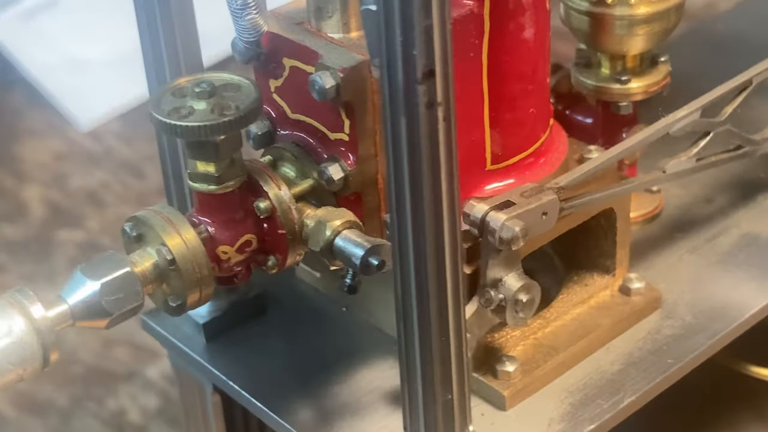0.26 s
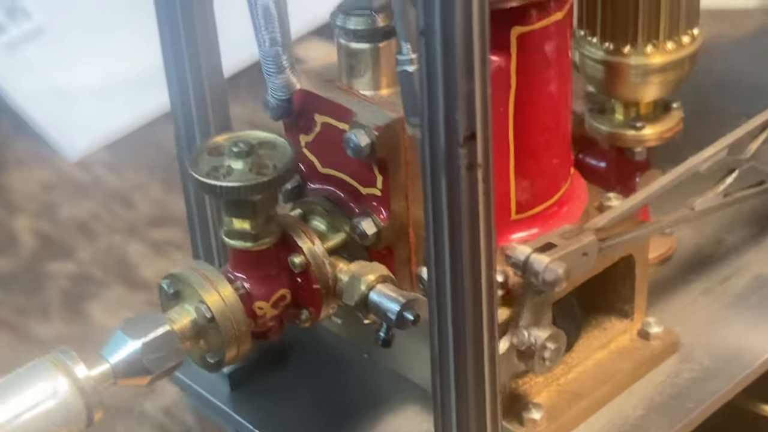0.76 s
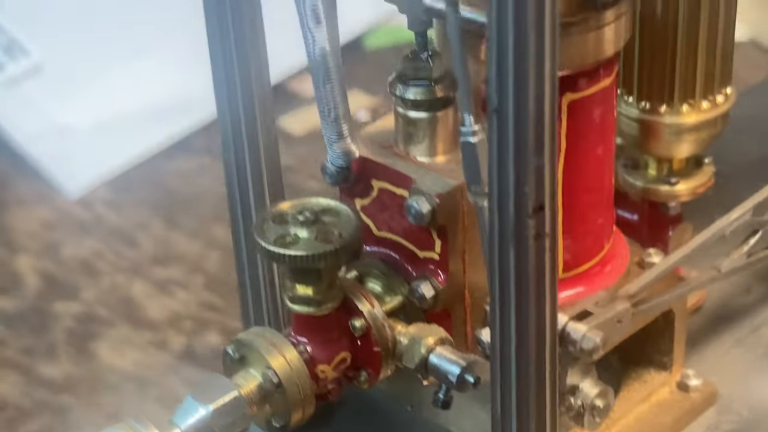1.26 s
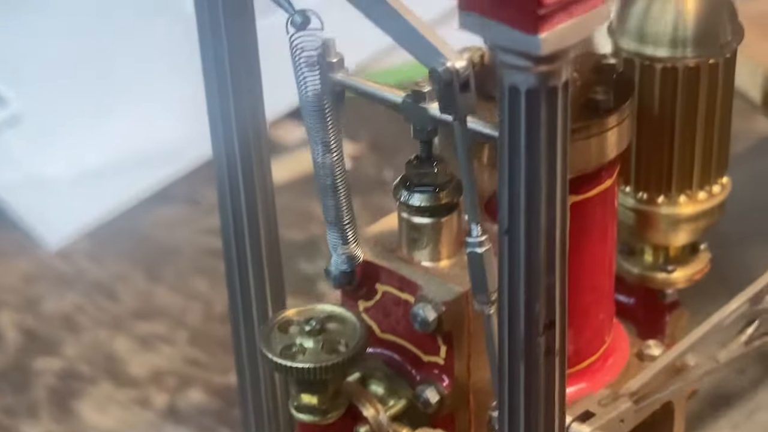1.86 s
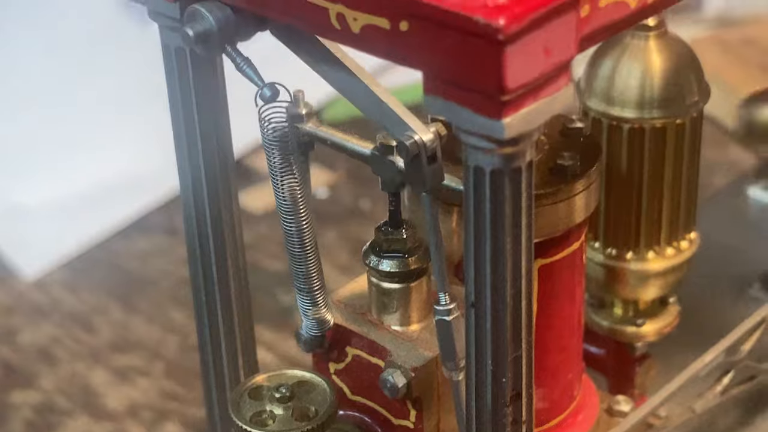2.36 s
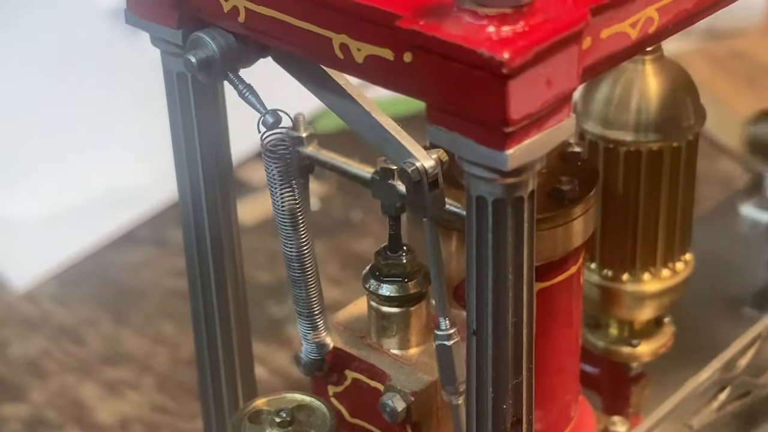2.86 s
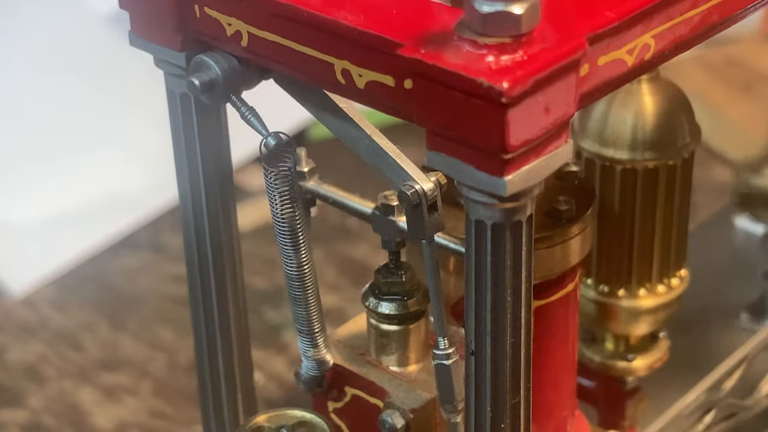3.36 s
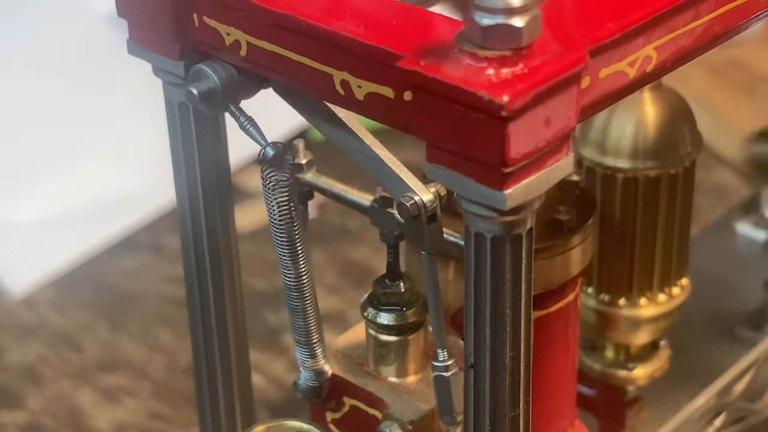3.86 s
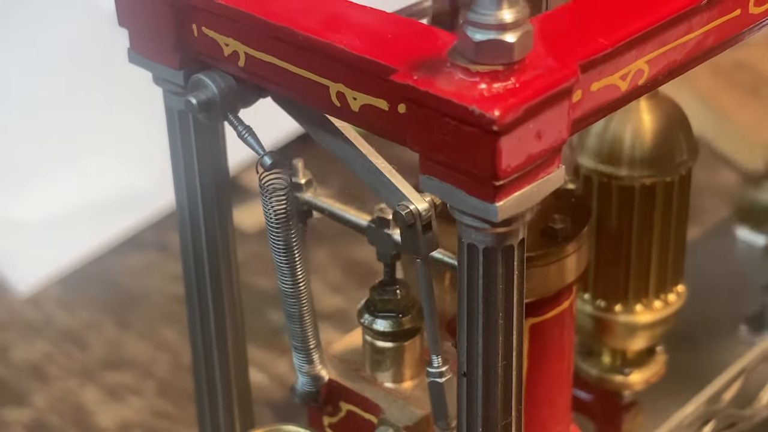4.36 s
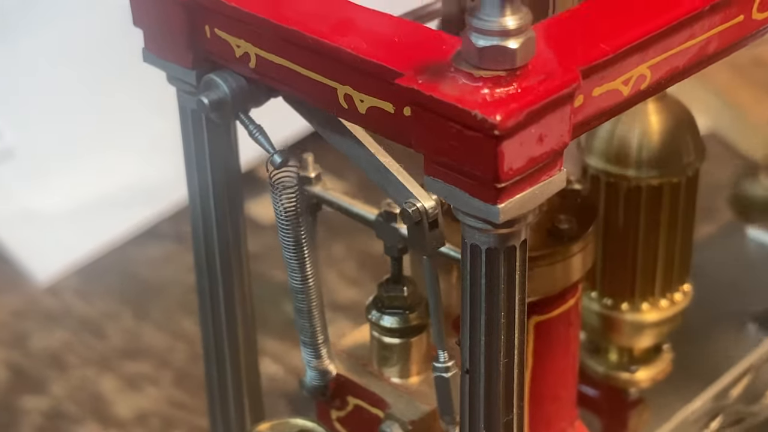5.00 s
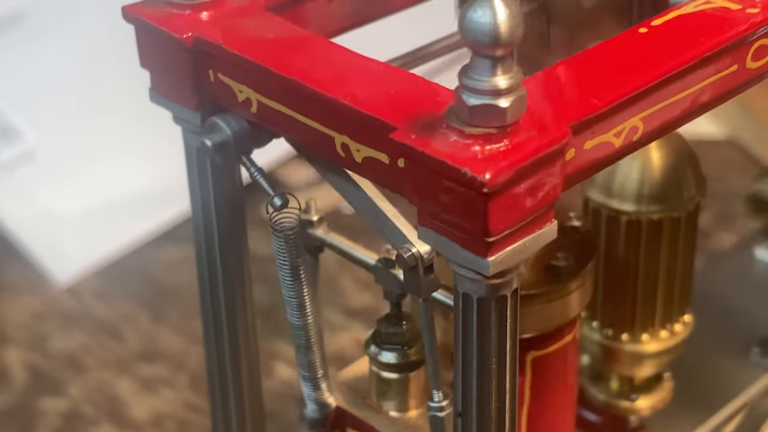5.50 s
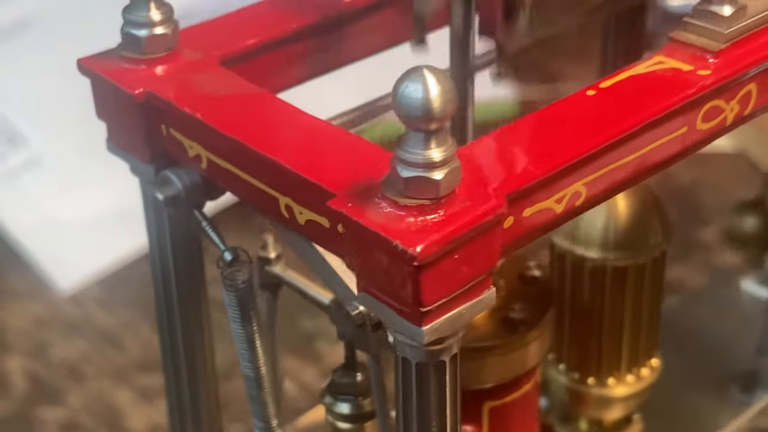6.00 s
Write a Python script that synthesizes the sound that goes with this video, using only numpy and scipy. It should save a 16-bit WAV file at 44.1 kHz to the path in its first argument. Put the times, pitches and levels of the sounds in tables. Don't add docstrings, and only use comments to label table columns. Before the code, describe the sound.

From 0 to about 6.2 seconds a small model beam engine runs on air without pause, a hand's width from a stereo phone microphone in a quiet room. Down strokes come roughly every 0.31 seconds, the first near 0.1, with up strokes midway between, making about 6.5 beats per second. Each beat is a turbulent hiss of some 30 to 40 milliseconds, bright around 10 kHz, and a short knock on the iron frame. Down knocks are heavier, preceded by a tiny flip; up knocks are lighter, higher and clicky, with a slight settling after. Uneven gear ticking and scraping fills the gaps, swelling between four and five times per second and dipping at the strokes. Faint low hum lies underneath. From about 1 to 2.6 seconds the rising phone leaves the jet's line and the hiss softens slightly. Near 6.2 a faint grip rumble ends it.

```python
import sys
import numpy as np
from scipy import signal
from scipy.fft import rfft, irfft
from scipy.io import wavfile
from scipy.ndimage import uniform_filter1d

SR = 44100
rng = np.random.default_rng(int(sys.argv[2]) if len(sys.argv) > 2 else 0)


def attenuation_scalar(level_db):
    decades = np.asarray(level_db, float) / 20
    return 10 ** decades


def log_audio(samples):
    frames = np.atleast_2d(samples).T
    limited = np.clip(frames, -1, 1)
    pcm = np.round(limited * 32767).astype(np.int16)
    wavfile.write(sys.argv[1], SR, pcm)


N = 275184
TIME = np.arange(N) / SR
FREQ = np.arange(N // 2 + 1) * SR / N


def unit(x):
    return x / np.sqrt(np.mean(x ** 2))


def noise():
    return rng.standard_normal((3, N))


def walk(rate_hz):
    hold = int(SR / rate_hz)
    steps = np.repeat(rng.standard_normal(N // hold + 1), hold)
    return unit(uniform_filter1d(steps, hold)[:N])


def band(x, hz, width_hz):
    return signal.lfilter(*signal.iirpeak(hz, hz / width_hz, SR), x)


def steep(x, hz, width_hz):
    section = np.concatenate(signal.iirpeak(hz, hz / width_hz, SR))
    return signal.sosfilt(2 * [section], x)


# t/s, height (0 = level with the valve, 1 = above it)
RISE = [(0, 0.01), (.8, .15), (1.4, .35), (1.8, .65), (2.6, .98), (3.6, 1.02), (4.5, .82), (5.3, .92),
        (6.24, .85)]


def rise():
    return np.interp(TIME, *np.transpose(RISE))


def opening(times, levels_db, valve):
    lead_s, attack_s, shut_s, release_s, full_db, leak_db, leak_s = valve

    def slide(share):
        return np.sin(np.pi / 2 * np.clip(share, 0, 1)) ** 2

    out = np.zeros(N)
    for s, level_db in zip(times, levels_db):
        near = slice(max(int((s - lead_s) * SR), 0), int((s + leak_s) * SR))
        t = TIME[near] - s
        flow = attenuation_scalar(full_db) * slide((shut_s - t) / release_s)
        leak = attenuation_scalar(leak_db) * np.clip(1 - t / leak_s, 0, 1)
        out[near] += attenuation_scalar(level_db) * slide((t + lead_s) / attack_s) * (flow + leak)
    return out


# opens before the knock t/s, attack t/s, shut after the knock t/s, release t/s,
# full level/dB, leak level/dB, leak gone after the knock t/s
DOWN_VALVE = (.0265, .015, .0115, .0215, 1.8, -20, .065)
UP_VALVE = (.029, .0155, .003, .0165, 3.4, -22, .065)


def valve(down_s, down_db, up_s, up_db):
    return opening(down_s, down_db, DOWN_VALVE) + opening(up_s, up_db, UP_VALVE)


# f/Hz, width f/Hz, level/dB, swell per governor turn level/dB
GEARS = [(302, 99, -62.5, 3.5), (554, 86, -52, 4), (735, 48, -48.5, 2.5), (800, 47, -51.5, 5),
         (1141, 59, -53.5, 6), (1364, 46, -49.5, 4), (1537, 183, -51, 2.5), (1713, 224, -46, 1.5),
         (1840, 48, -51, 2), (1965, 151, -51, 2), (2498, 115, -58.5, 4.5), (2710, 670, -51.5, 1),
         (3498, 165, -52.5, 0.5), (4560, 150, -56, 2.5), (4902, 72, -50.5, 7.5), (5294, 93, -60.5, -2),
         (4200, 250, -61, 26), (5490, 124, -55, 6), (6640, 260, -55, 3), (7570, 300, -54, 2),
         (8380, 470, -50, 3), (9080, 930, -47.5, 4), (10430, 520, -55.5, 1.5), (11440, 300, -57.5, 2),
         (12900, 330, -65, -2), (15600, 200, -67, 5)]
# f/Hz, width f/Hz, level/dB
TOOTH_CLICK = [(4976, 870, -50.5), (8000, 3200, -69), (10800, 1200, -62)]
# t/s, level/dB
FACING = [(0, 3.5), (.6, 1.5), (1.3, 1.5), (2, 0.8), (3, 1.3), (4, 1), (5, 0.8), (6.24, 2.2)]


def gears(down, up):
    tooth_hz, rub_s = 143.3, 0.00086
    governor_turns, governor_start = 1.415, .436

    earlier_s = 2 * down[0, 0] - down[0, 1]
    crank = np.interp(TIME, np.r_[earlier_s, down[0]], np.arange(len(down[0]) + 1) - 1.01)
    bite = np.tanh(2.75 * np.cos(2 * np.pi * (governor_turns * crank - governor_start)))
    bite = bite + .12 * np.interp(TIME, *np.transpose(FACING))

    gap, size = rng.standard_normal((int(N / SR * tooth_hz * 2), 2)).T
    at = np.cumsum((1 + .06 * gap) * SR / tooth_hz).astype(int)
    teeth = np.zeros(N)
    teeth[at[at < N]] = attenuation_scalar(1.5 * size[at < N])

    scrape = signal.lfilter([1], [1, -np.exp(-1 / (rub_s * SR))], teeth)
    rub = (unit(scrape) + attenuation_scalar(5.0)) * noise()
    contact = (unit(teeth) * attenuation_scalar(-1) + rub) * attenuation_scalar(0.66 * walk(30))

    clicks = teeth * attenuation_scalar(14.4 * bite)
    out = sum(attenuation_scalar(db) * unit(steep(clicks, hz, 0.93 * width_hz)) for hz, width_hz, db in TOOTH_CLICK)
    for hz, width_hz, db, swell_db in GEARS:
        ring = steep(contact * attenuation_scalar(0.96 * swell_db * bite), hz, 1.32 * width_hz)
        out = out + attenuation_scalar(db) * unit(ring)

    slack = np.clip(valve(down[0], 0 * down[0], up[0], 0 * up[0]), 0, 1)
    return out * attenuation_scalar(-4 * slack)


# f/Hz, width f/Hz, level/dB
HUM = [(64.4, 15, -66.5), (75, 19, -65), (121, 10.3, -58.5), (195, 40, -66), (253, 27, -61),
       (450, 230, -58.5), (956, 76, -58.5)]


def hum():
    return sum(attenuation_scalar(db + 1.1 * walk(3.6)) * unit(band(noise(), hz, width_hz)) for hz, width_hz, db in HUM)


# f/Hz, level/dB
JET = [(2300, -25.5), (3200, -22.5), (3700, -9.5), (4000, -5.5), (4400, -8.5), (5000, -18.5), (6700, -17),
       (7600, -6), (8400, -5.5), (9200, -1.5), (10200, 3), (11200, -5.5), (13200, -16.5), (15300, -18.5)]
JET_EDGES = (5700, 8500, 11800)
# level with the valve level/dB, from above level/dB, extra on the up stroke level/dB, lag t/s
JET_AIM = [
    (-36.2, -37, 1.5, .002),
    (-37.5, -35.8, 1.7, .0017),
    (-22.7, -29.5, 0.1, 0),
    (-35.6, -32.9, -.5, .0004),
]


def exhaust(down, up):
    hz, db = np.transpose(JET)
    jet = rfft(noise()) * attenuation_scalar(np.interp(np.log(FREQ + 1), np.log(hz), db, left=-60))
    zone = np.digitize(FREQ, JET_EDGES)
    flutter = attenuation_scalar(1.5 * walk(400))
    height = rise()

    def strength(strokes):
        _, puff_db, dull_db, thin_db = strokes
        return puff_db + [dull_db, dull_db, 0 * dull_db, thin_db]

    down_db, up_db = strength(down), strength(up)
    out = 0
    for part, (level_db, above_db, extra_db, lag_s) in enumerate(JET_AIM):
        puffs = valve(down[0] + lag_s, down_db[part], up[0] + lag_s, up_db[part] + extra_db)
        heard_db = level_db + (above_db - level_db) * height + 0.89 * walk(150)
        out = out + attenuation_scalar(heard_db) * puffs * flutter * unit(irfft(jet * (zone == part), N))
    return out


def knocks(times, size_db, modes):
    t = np.arange(SR // 5) / SR
    ring = 0
    for hz, db, t60, side in modes:
        decay = np.exp(-np.log(1000) * t / t60)
        ring = ring + np.sign(side) * attenuation_scalar(db) * decay * np.sin(2 * np.pi * hz * t)
    push = np.hanning(31)
    blows = np.zeros(N)
    blows[(times * SR).astype(int)] = attenuation_scalar(size_db)
    return signal.fftconvolve(blows, np.convolve(ring, push / push.sum()))[:N]


# f/Hz, level/dB, t60 t/s, first swing + or -
FLIP = [(375, -32, 0.033, 1), (428, -28, .027, -1), (500, -30.5, 0.075, 1)]
HEAVY = [(77.4, -44.5, 0.19, -1), (128.8, -39.5, 0.2, 1), (289.6, -38.5, 0.12, -1), (439.7, -20, 0.06, 1),
         (507, -31, 0.085, 1), (581, -17.5, 0.022, -1), (712.4, -31, 0.066, -1), (760, -28.5, .022, -1),
         (1440, -29.5, 0.036, 1), (1810, -20.5, 0.0031, -1)]
LIGHT = [(125, -53, 0.29, 1), (275, -50, 0.074, 1), (484, -26, 0.0092, 1), (505.7, -24, 0.036, -1),
         (733.5, -53, 0.13, 1), (1415, -29.5, 0.025, 1), (1703, -15.5, 0.0091, -1), (1910, -13, 0.0059, 1)]
SETTLE = [(400, -36.5, 0.017, 1), (345, -41, 0.029, 1), (274.6, -39, 0.095, -1)]


def frame(down_s, up_s):
    down_db, up_db = -1.05, -0.1
    flip_lead_s, settle_lag_s = .0191, 0.00657
    heavy = knocks(down_s - flip_lead_s, down_db, FLIP) + knocks(down_s, down_db, HEAVY)
    light = knocks(up_s, up_db, LIGHT) + knocks(up_s + settle_lag_s, up_db, SETTLE)
    return heavy + light


# t/s, length t/s, level/dB
GRIPS = [
    (6.215, .04, -49),
]
# f/Hz, width f/Hz
GRIP_BAND = (85, 70)


def grip():
    swell = sum(attenuation_scalar(db) * np.exp(-((TIME - s) / length_s) ** 2) for s, length_s, db in GRIPS)
    return swell * unit(steep(noise(), *GRIP_BAND))


# f/Hz, width f/Hz, share taken away
SHADE = (2760, 360, .7)


def shaded(x):
    hz, width_hz, share = SHADE
    return x - share * np.clip(1 - rise(), 0, 1) * band(x, hz, width_hz)


# f/Hz, left lead [rad], share of scattered sound level/dB, left minus right level/dB
PORTS = [(30, 0.5, -7, -4), (125, 0.57, -16, -3), (370, 0.8, -17, -0.5), (980, 0, -5.5, 0.5),
         (1404, -1.7, -7, 4), (1950, -3, 4.5, .5), (2690, -2.5, -2, -0.9), (4060, -1.5, -7, 1.3),
         (5150, 3.29, -3.5, -2.5), (6370, 6, 3, 2.8), (6750, -0.5, -21.5, -.3), (8930, -3, -16.5, -1.2),
         (11360, -6, -32, 0.5), (13950, -10, -16, -1), (16600, -16.5, -24, 2)]


def ports(x):
    hz, lead, share_db, pan_db = np.transpose(PORTS)
    turn = np.exp(.5j * np.interp(FREQ, hz, lead))
    share = np.clip(attenuation_scalar(np.interp(FREQ, hz, share_db)), 0, 1)
    pan = attenuation_scalar(np.interp(FREQ, hz, pan_db) / 2)
    direct, *scatter = rfft(x)
    heard = np.sqrt(1 - share ** 2) * np.array([turn, 1 / turn]) * direct + share * np.array(scatter)
    return irfft(heard * [pan, 1 / pan], N)


# knock t/s, puff level/dB, its dull part level/dB, its thinnest part level/dB
DOWN = [(0.1089, 0.4, 0.0, -0.3), (0.4169, 0.4, 1.2, 0.2), (0.7251, 0.4, -1.3, 0.3),
        (1.0325, -0.7, -0.7, 0.3), (1.3401, 0.8, -1.9, -2.8), (1.6489, 0.8, 0.7, 0.3),
        (1.9551, -0.2, 0.1, 0.4), (2.2615, 0.2, -2.4, -0.7), (2.5693, -0.6, 2.1, -0.3),
        (2.8747, 0.9, -1.3, -3.5), (3.1813, -0.2, 0.8, -1.0), (3.4871, -1.4, 2.7, 0.9),
        (3.7923, 0.4, -0.6, -0.1), (4.0989, -0.5, 1.2, 0.8), (4.4042, 1.7, -1.1, 0.4),
        (4.71, 0.2, -0.1, 0.3), (5.0147, -0.3, 0.3, -0.2), (5.3206, -0.8, -0.1, 1.6),
        (5.6262, 0.5, -1.1, -0.3), (5.93, -2.1, 2.1, 1.6), (6.2356, -0.1, -0.7, 2.1)]
UP = [(0.2636, 0.1, 1.1, 1.4), (0.5734, -0.8, -0.1, -0.4), (0.8797, -1.0, 0.0, -0.1),
      (1.1885, -0.1, 1.0, 0.8), (1.4962, 1.4, -0.5, -1.9), (1.8036, -1.1, 0.9, 0.3),
      (2.1106, -1.5, 1.1, -1.1), (2.4176, -0.4, 1.6, -1.4), (2.7237, 1.2, -1.2, -1.2),
      (3.0294, -0.4, 2.4, 0.5), (3.335, 0.1, -0.5, 1.2), (3.6409, 1.4, -1.1, -0.3),
      (3.9465, 2.6, -3.8, -3.2), (4.2531, 1.4, 0.1, 2.0), (4.5591, 1.2, -0.7, 1.8),
      (4.8644, -0.4, 0.1, 1.6), (5.1691, 0.5, -1.0, 0.4), (5.4744, -0.3, 0.9, -1.8),
      (5.7795, 1.2, -0.3, -0.2), (6.0839, -1.4, -0.1, 1.6)]


def scene():
    down, up = np.transpose(DOWN), np.transpose(UP)
    engine = gears(down, up) + exhaust(down, up) + frame(down[0], up[0])
    return ports(shaded(engine) + hum() + grip())


def top_cut(x):
    return signal.sosfilt(signal.butter(12, 16940, fs=SR, output="sos"), x)


def record(dry):
    x = signal.sosfilt(signal.butter(2, 45, "high", fs=SR, output="sos"), dry)
    x = signal.sosfilt(signal.ellip(10, .2, 70, 15800, fs=SR, output="sos"), x)
    return top_cut(x)


dry = scene()
out = record(dry)
log_audio(out)
```